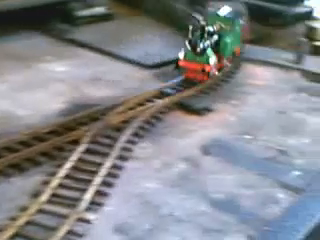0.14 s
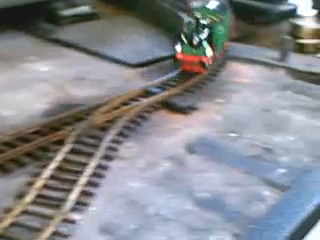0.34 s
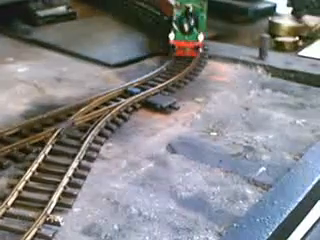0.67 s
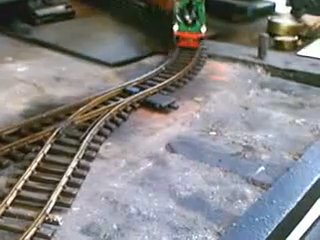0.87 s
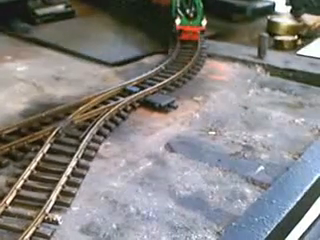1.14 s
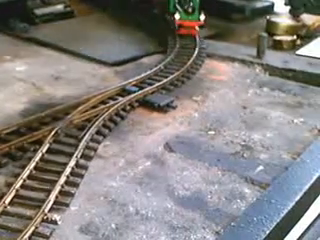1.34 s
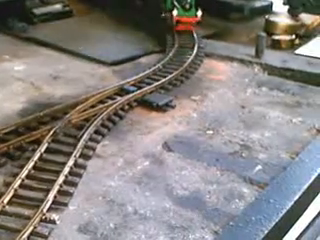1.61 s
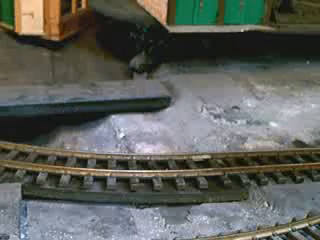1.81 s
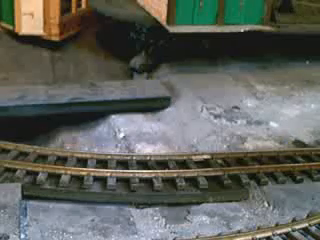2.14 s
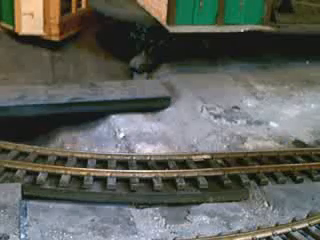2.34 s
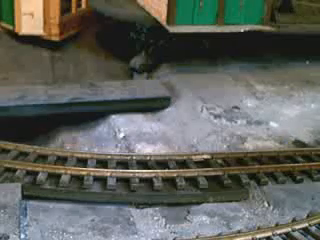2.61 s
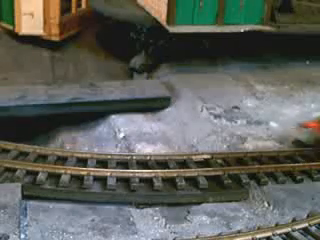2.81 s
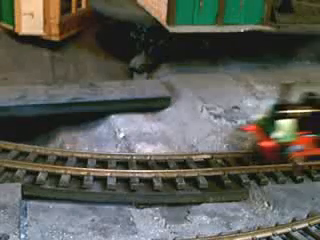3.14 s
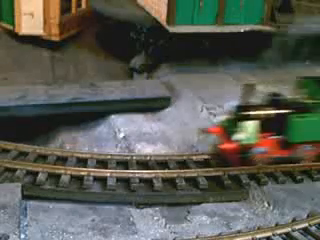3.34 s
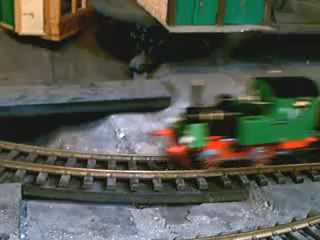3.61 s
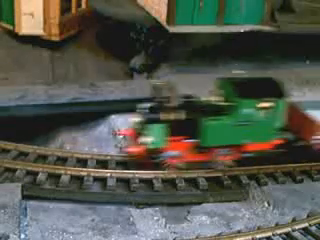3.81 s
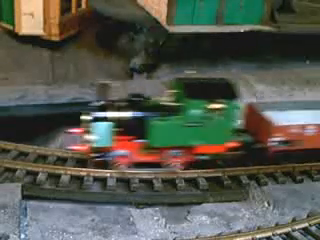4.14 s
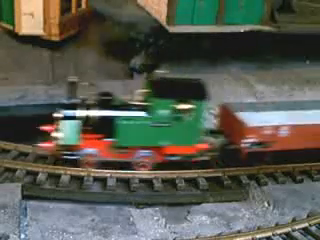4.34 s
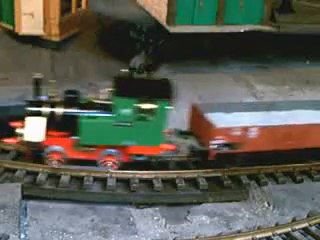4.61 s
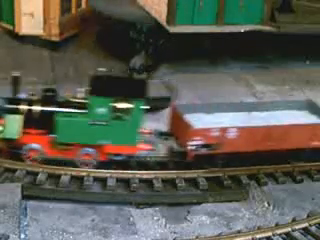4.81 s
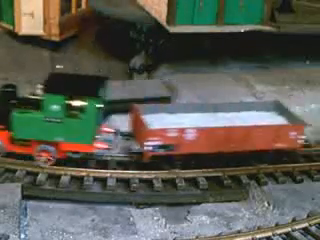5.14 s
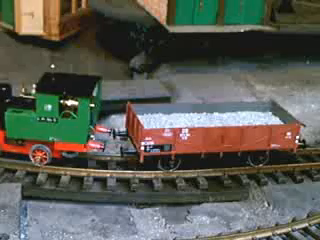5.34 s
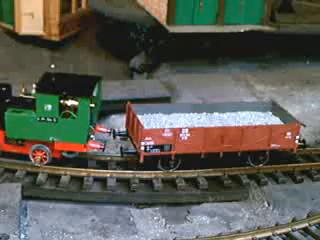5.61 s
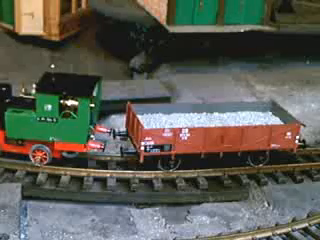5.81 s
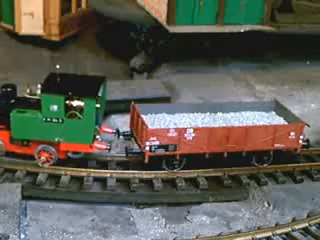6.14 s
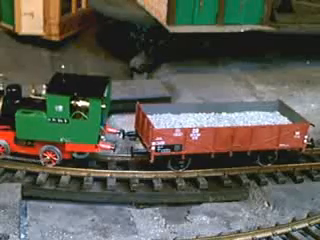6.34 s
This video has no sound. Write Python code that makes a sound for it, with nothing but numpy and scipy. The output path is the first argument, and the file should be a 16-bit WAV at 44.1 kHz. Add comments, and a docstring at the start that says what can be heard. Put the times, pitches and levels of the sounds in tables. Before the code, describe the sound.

Quick wet steam puffs and harsh metallic hiss from a toy-sized live-steam engine passing indoors, with ticking wheels, low rumble and handling knocks.

```python
"""A small live-steam model locomotive chuffs along indoors, nears, passes and comes to rest.
Wet steam leaves the chimney in quick beats and spits over a hiss: sputtering noise shaped into bands.
Wheels and rods tick as noise bursts; the layout rumbles as filtered noise, the boards drone as sines.
A hand-held camera clacks and is scraped, its zero level steps in soft low thumps, a low hum swells once.
Its low sample rate mirrors the hiss into the treble."""
import sys
import numpy as np
from scipy import signal
from scipy.fft import rfft, irfft
from scipy.io import wavfile
from scipy.ndimage import uniform_filter1d

SR = 44100
rng = np.random.default_rng(int(sys.argv[2]) if len(sys.argv) > 2 else 0)


def store_pcm(level_fs):
    """Save levels as 16-bit WAV."""
    pcm = np.round(np.clip(level_fs, -1, 1) * 32767).astype(np.int16)
    wavfile.write(sys.argv[1], SR, np.atleast_2d(pcm).T)


N = 284881
TIME = np.arange(N) / SR
FOLD_HZ = SR / 8  # Nyquist limit of the quarter-rate sampling


def amp(db):
    """Decibels to gain."""
    return 10 ** (np.asarray(db) / 20)


def evened(x):
    """Scales to rms 1."""
    return x / np.sqrt(np.mean(x ** 2) + 1e-20)


def curves(rows, t=TIME):
    """Columns of a table, interpolated linearly along its first column."""
    times, *columns = np.transpose(rows)
    return [np.interp(t, times, column) for column in columns]


def spectrum(points, hz):
    """Gain of an (Hz, dB) table on a log-frequency axis."""
    f, db = np.transpose(points)
    return amp(np.interp(np.log(hz + 1), np.log(f), db))


def filtered(x, gain):
    """Filters x by a gain that is a function of frequency."""
    hz = np.fft.rfftfreq(2 * N, 1 / SR)
    return irfft(rfft(x, 2 * N) * gain(hz))[:N]


def bell(x, centre, width):
    """Gaussian of height 1; width is its standard deviation."""
    return np.exp(-((x - centre) / width) ** 2 / 2)


def flutter(rate_hz):
    """Low-passed noise of rms 1, Gaussian roll-off of width rate_hz."""
    return evened(filtered(rng.standard_normal(N), lambda hz: bell(hz, 0, rate_hz)))


def add(mix, start_s, sound):
    """Adds a sound into the mix at start_s."""
    part = mix[round(start_s * SR):][:len(sound)]
    part += sound[:len(part)]


# engine speed: (time [s], exhaust beats [1/s])
BEAT_RATE = [(0.0, 19.18), (0.65, 14.21), (1.05, 11.87), (1.45, 6.8), (2.3, 9.6), (2.5, 12.85),
             (3.2, 12.61), (3.35, 10.77), (4.2, 9.65), (5.3, 4.74), (5.4, 0.0)]
# puff peak over fully closed flow: (time [s], depth [dB]), before uneven strength
BEAT_DEPTH_DB = [(0, 4), (1.2, 6), (1.55, 5.5), (1.95, -1), (2.5, 3), (3.1, 4), (4.25, 0.5), (4.6, -2),
                 (5.4, -0.5)]


def exhaust_beats(lead_beats=0.16, opening_beats=0.037, emptying_beats=0.7, uneven_db=1.0):
    """Valve opens quickly, cylinder empties exponentially; gain of local mean power near 1."""
    beats = np.cumsum(curves(BEAT_RATE)[0]) / SR + lead_beats
    age = beats % 1
    opening = 1 - bell(age, 0, opening_beats)
    puff = opening * np.exp(-age / emptying_beats) * (1 - age ** 10)
    strength_db = uneven_db * rng.standard_normal(200)[beats.astype(int)]  # one draw per beat
    depth_db = curves(BEAT_DEPTH_DB)[0] + strength_db
    gain = amp(puff / puff.max() * depth_db)
    return gain / np.sqrt(uniform_filter1d(gain ** 2, size=12000))


# steam before surging: (time [s], level [dB])
STEAM_LEVEL = [(0, -21), (.8, -22.5), (1.55, -23), (1.7, -22.5), (1.95, -23.5), (2.15, -22), (2.55, -17),
               (2.75, -18), (3.08, -21.5), (3.3, -19), (3.85, -20), (4.3, -18.5), (4.7, -21), (5.05, -21.5),
               (5.3, -22.5), (5.45, -26.5), (6.46, -24)]
# water slugs from the chimney: (peak time [s], peak level [dB], length scale before rise/fall factors [s])
WATER_SPITS = [(0.218, -20, .008), (.519, -16, 0.011), (1.037, -15.5, .011), (1.227, -19, .01),
               (1.465, -15.5, 0.011), (1.617, -23, 0.035), (1.762, -13, 0.0089), (1.808, -11.5, 0.0094),
               (2.494, -18, .006), (2.576, -14.5, .007), (2.657, -19, .007), (2.983, -16.5, 0.0099),
               (3.277, -15.5, 0.0088), (4.88, -16.5, 0.0081), (5.837, -24, 0.021), (5.911, -22.5, 0.019),
               (6.387, -21.5, 0.042)]


def steam_flow(rise_factor=0.23, fall_factor=1.03, roundness=2.7, surge_db=0.98, surge_hz=49):
    """Power of beating, surging steam plus spits that open faster than they die."""
    steam_db = curves(STEAM_LEVEL)[0] + surge_db * flutter(surge_hz)
    power = (exhaust_beats() * amp(steam_db)) ** 2
    t = np.arange(round(SR / 5)) / SR - 1 / 10  # 0 at the peak
    for peak_s, db, length_s in WATER_SPITS:
        scale_s = length_s * np.where(t < 0, rise_factor, fall_factor)
        pulse = np.exp(-abs(t / scale_s) ** roundness)
        add(power, peak_s + t[0], amp(db) ** 2 * pulse)
    return power


def wet_steam(sputter_db=1.5, sputter_hz=370, drops_per_s=420, drop_spread_db=2.5, drop_db=-6):
    """Sputtering turbulence with bursting droplets: modulated noise plus random impulses."""
    turbulence = evened(rng.standard_normal(N) * amp(sputter_db * flutter(sputter_hz)))
    size_db = drop_spread_db * np.minimum(rng.exponential(1, N), 4)
    size = amp(size_db) * rng.choice([-1, 1], N)
    drops = evened(size * (rng.random(N) < drops_per_s / SR))
    return evened(turbulence + amp(drop_db) * drops)


# bright jet parts re whistle: (time [s], chimney ring before punch [dB], sizzle [dB])
JET_PARTS = [(0, 2, -2), (1.6, 5, -1), (1.95, -0.5, -7.5), (2.6, -17, 0), (3.5, -1.5, -8),
             (5.28, -4.5, -10), (5.5, -15, -23), (6.0, -8, -15), (6.46, -8, -3.5)]
# broad rush spectrum: (frequency [Hz], gain [dB]), before the rush level and shade
RUSH_SPECTRUM = [(60, 6), (220, -2), (550, -0.5), (1200, -1.5), (1900, -1.5), (2700, -1), (3200, 3),
                 (3750, 6.5), (4500, 11), (5500, -1)]


def exhaust(whistle_hz=4820, whistle_sag_hz_per_s=33, whistle_width_hz=330,
            ring_hz=4260, ring_width_hz=140, ring_follow=0.41, sizzle_hz=5230, sizzle_width_hz=380,
            rush_far_db=-10.5, rush_near_db=-16, near_s=2.9,
            shade_db=-3.5, shade_hz=3400, shade_width_hz=280):
    """Steam jet: broad rush, sinking breathy whistle, chimney ring and sizzle."""
    flow = steam_flow()
    hz, t, jet = signal.stft(wet_steam() * np.sqrt(flow), SR, nperseg=512)
    hz = hz[:, None]
    ring_db, sizzle_db = curves(JET_PARTS, t)
    # a beat above its neighbours rings the chimney harder
    punch = np.interp(t, TIME, flow / uniform_filter1d(flow, size=8000))
    whistle = bell(hz, whistle_hz - whistle_sag_hz_per_s * t, whistle_width_hz)
    ring = amp(ring_db) * punch ** ring_follow * bell(hz, ring_hz, ring_width_hz)
    sizzle = amp(sizzle_db) * bell(hz, sizzle_hz, sizzle_width_hz)
    # the jet gains on the rush until near_s; from afar the hiss has a steeper lower edge
    rush_db = np.interp(t, [0, near_s], [rush_far_db, rush_near_db])
    shade_now_db = np.interp(t, [0, near_s], [shade_db, 0])
    rush_gain = amp(rush_db + shade_now_db * bell(hz, shade_hz, shade_width_hz))
    rush = rush_gain * spectrum(RUSH_SPECTRUM, hz)
    power = whistle ** 2 + ring ** 2 + rush ** 2 + sizzle ** 2
    power = power * np.clip(.5 + (FOLD_HZ - hz) / 500, 0, 1)
    # flow sets the level of the treble; the rush follows it
    power = power / np.mean(power * (hz > 3500), axis=0)
    return signal.istft(jet * np.sqrt(power), SR, nperseg=512)[1][:N]


# layout and hand-held camera: (time [s], level before trim_db [dB])
RUMBLE_LEVEL = [(0, -34), (.35, -28), (.5, -25.5), (.75, -26), (.9, -31.5), (1.3, -31.5), (1.7, -26.5),
                (1.95, -44.5), (3.4, -36), (4.2, -34), (6.46, -34.5)]
# rumble spectrum: (frequency [Hz], gain before low-pass and evening [dB])
RUMBLE_SPECTRUM = [(5, 4), (18, 1.5), (35, 2), (55, -0.5), (100, -5), (150, -12.5), (250, -21),
                   (600, -43.5)]


def rumble(trim_db=-2, lowpass_hz=900):
    """Low rumble of layout and camera: filtered noise under a level curve."""
    noise = filtered(rng.standard_normal(N),
                     lambda hz: spectrum(RUMBLE_SPECTRUM, hz) * bell(hz, 0, lowpass_hz))
    return evened(noise) * amp(curves(RUMBLE_LEVEL)[0] + trim_db)


def rolling(hz_centre=260, width_hz=130, peak_db=-44.5, nearest_s=3.6, pass_s=1.67):
    """Wheel roll: band noise that swells and fades as the train passes."""
    noise = evened(filtered(rng.standard_normal(N), lambda hz: bell(hz, hz_centre, width_hz)))
    return noise * amp(peak_db) * bell(TIME, nearest_s, pass_s)


# droning board stretches, before waver and throb:
# (middle [s], Gaussian width [s], pitch at middle [Hz], glide [Hz/s], rms level at middle [dB])
BOARD_DRONES = [(0.638, 0.45, 80, -3.5, -33), (4.349, 0.49, 95, 6.5, -42)]


def drones(waver_hz=4, waver_rate_hz=8.6, throb_db=2.0, throb_rate_hz=15):
    """Boards under the wheels: gliding sines with wavering pitch and throbbing level."""
    out = np.zeros(N)
    waver, throb = waver_hz * flutter(waver_rate_hz), throb_db * flutter(throb_rate_hz)
    for middle_s, width_s, pitch_hz, glide_hz_per_s, db in BOARD_DRONES:
        pitch = pitch_hz + glide_hz_per_s * (TIME - middle_s) + waver
        phase = 2 * np.pi * np.cumsum(pitch) / SR
        out += np.sqrt(2) * np.sin(phase) * amp(db + throb) * bell(TIME, middle_s, width_s)
    return out


# wheel and rod ticks: (time [s], level before decay [dB], pitch [Hz])
WHEEL_TICKS = [(0.215, -29, 2000), (.520, -22, 4300), (.826, -15.5, 2700), (1.196, -20.5, 2230),
               (1.565, -21, 2500), (2.286, -10, 4740), (2.569, -12, 4600), (2.971, -13, 4940),
               (3.259, -9.5, 4400), (3.393, -8, 4590), (3.934, -21.5, 1901), (5.040, -19, 2170)]


def ticks(t60_s=0.01, width_hz=1100):
    """Wheels and rods click: decaying band-noise bursts."""
    out, t, hz = np.zeros(N), np.arange(1024) / SR, np.fft.rfftfreq(1024, 1 / SR)
    for start_s, db, pitch_hz in WHEEL_TICKS:
        band = bell(hz, pitch_hz, width_hz) * (hz < FOLD_HZ)
        burst = evened(irfft(rfft(rng.standard_normal(len(t))) * band))
        add(out, start_s, burst * amp(db - 60 * t / t60_s))
    return out


def room(x, t60_s=0.26, wet_db=-16, taps_per_s=2000, gap_s=.004):
    """Small room: sparse random reflections decaying exponentially."""
    t = np.arange(round(SR / 2)) / SR
    hits = (rng.random(len(t)) < taps_per_s / SR) * (t > gap_s)
    taps = rng.choice([-1, 1], len(t)) * hits * amp(-60 * t / t60_s)
    return x + amp(wet_db) * signal.fftconvolve(x, taps / np.linalg.norm(taps))[:N]


# blows on the camera body: (time [s], gain [dB])
CAMERA_BLOWS = [(1.6899, -11.5), (1.6945, 5), (1.6961, -3), (1.7105, -20.5)]
# camera body modes: (frequency [Hz], level re blow [dB], t60 [s])
BODY_MODES = [(1615, -18, 0.018), (1820, -9.5, 0.015), (2015, 2, 0.009), (2396, -8, 0.012),
              (2960, -14.5, 0.0053)]


def clacks(crack_db=-7, crack_t60_s=0.017, crack_hz=2700, crack_width_hz=1600,
           push_db=-20, push_s=0.0089, contact_s=0.00029):
    """Camera body struck: ringing modes, a noise crack and a slow push."""
    out, t = np.zeros(N), np.arange(round(SR / 10)) / SR
    ring = sum(amp(db - 60 * t / t60_s) * np.sin(2 * np.pi * hz * t) for hz, db, t60_s in BODY_MODES)
    push = amp(push_db) * t / push_s * np.exp(1 - t / push_s) / 2
    contact = np.minimum(t / contact_s, 1)  # plastic gives a little as it is struck
    band = bell(np.fft.rfftfreq(len(t), 1 / SR), crack_hz, crack_width_hz)
    for start_s, db in CAMERA_BLOWS:
        snap = evened(irfft(rfft(rng.standard_normal(len(t))) * band))
        crack = amp(crack_db - 60 * t / crack_t60_s) * snap
        add(out, start_s, amp(db) * contact * (ring + crack + push))
    return filtered(out, lambda hz: hz < FOLD_HZ)


# soft low thumps: (time [s], level before factor [dB], signed step factor [1])
LOW_THUMPS = [(1.696, -20.5, 0.67), (2.411, -14, 0.78), (2.961, -19.5, -1.02), (3.665, -23, -1.06),
              (4.699, -24.5, -1.2), (4.887, -23.5, 0.79), (5.401, -18, -1.4), (6.38, -16, 0.92)]


def thumps(rise_s=0.0032, settle_s=0.15):
    """Soft low thumps: the recorder's zero level steps, then settles slowly."""
    out, t = np.zeros(N), np.arange(SR) / SR
    step = (1 - np.exp(-t / rise_s)) * np.exp(-t / settle_s)
    for start_s, db, step_factor in LOW_THUMPS:
        add(out, start_s, step_factor * amp(db) * step)
    return out


def scrape(start_s=1.70, peak_s=1.774, peak_db=-19.5, rise_db_per_s=276, fall_db_per_s=703,
           band_hz=2450, width_hz=600, slip_db=2.7, slip_hz=300):
    """Finger scrapes over the camera: stuttering band noise, exponential rise and fall."""
    slips = rng.standard_normal(N) * amp(slip_db * flutter(slip_hz))
    grit = evened(filtered(slips, lambda hz: bell(hz, band_hz, width_hz)))
    late_s = TIME - peak_s
    pressure_db = peak_db + np.minimum(rise_db_per_s * late_s, -fall_db_per_s * late_s)
    return grit * amp(pressure_db) * (TIME > start_s)


def hum(hum_hz=64.4, waver_hz=.5, waver_rate_hz=7.5, full_s=1.78, end_s=2.17, fade_s=0.048,
        first_db=-35.5, third_db=-48.5, third_fade_s=.6):
    """Low sine swells once, holds and fades; its third harmonic lingers."""
    phase = 2 * np.pi * np.cumsum(hum_hz + waver_hz * flutter(waver_rate_hz)) / SR
    attack = bell(np.minimum(TIME, full_s), full_s, fade_s)
    after_s = np.maximum(TIME - end_s, 0)
    first = amp(first_db) * np.exp(-after_s / fade_s) * np.sin(phase)
    third = amp(third_db) * np.exp(-after_s / third_fade_s) * np.sin(3 * phase)
    return np.sqrt(2) * attack * (first + third)


def scene():
    """Engine in its room, layout sounds, camera sounds and hum."""
    engine = room(exhaust() + ticks())
    layout = rumble() + rolling() + drones()
    camera = clacks() + thumps() + scrape()
    return (engine + layout + camera + hum())[None]


# camera smoothing filter: (frequency [Hz], gain [dB])
SMOOTHING_FILTER = [(5500, 0), (6290, -2.4), (7150, -5.4), (8010, -9.8), (8440, -13.2), (9300, -22.4),
                    (9730, -28.2)]


def record(dry, overload=.87, edge_hz=9850):
    """Quarter-rate sampling mirrors the hiss upward; then smoothing, overload and band limit."""
    sampled = 4 * np.clip(dry[0], -1, 1) * (np.arange(N) % 4 == 0)
    smooth = filtered(sampled, lambda hz: spectrum(SMOOTHING_FILTER, hz))
    clipped = np.clip(smooth, -overload, overload)
    lowpass = signal.firwin(511, edge_hz, window=("kaiser", 9), fs=SR)
    return signal.oaconvolve(clipped, lowpass, "same")[None]


dry = scene()
out = record(dry)
store_pcm(out)
```